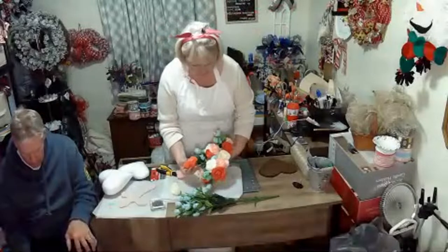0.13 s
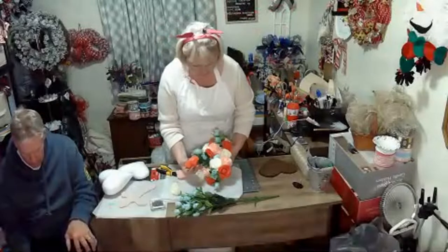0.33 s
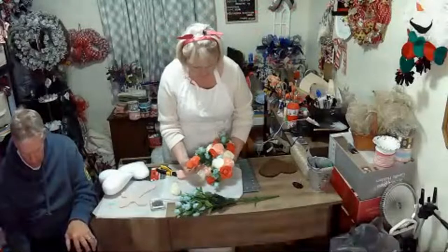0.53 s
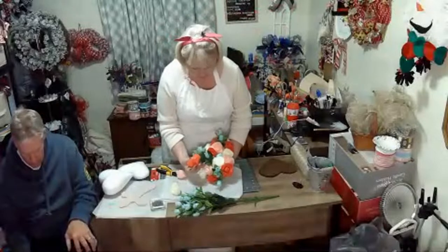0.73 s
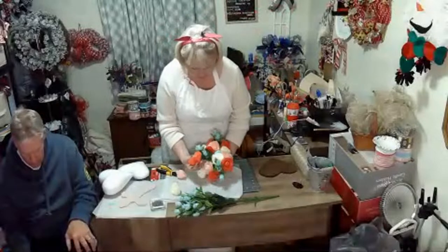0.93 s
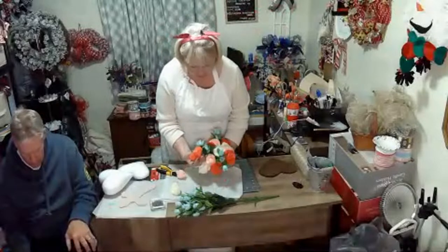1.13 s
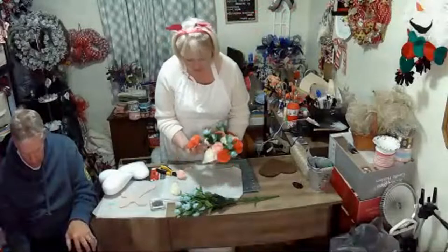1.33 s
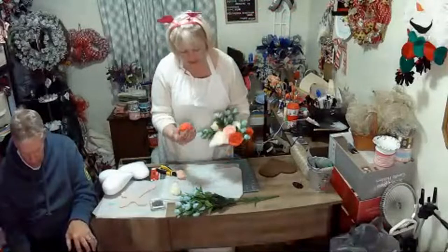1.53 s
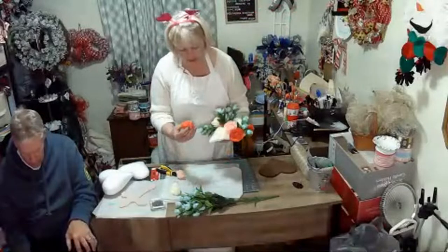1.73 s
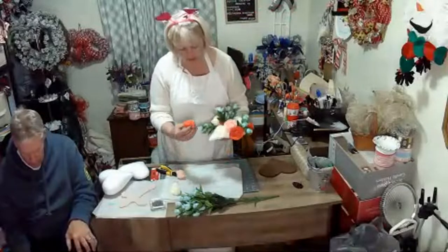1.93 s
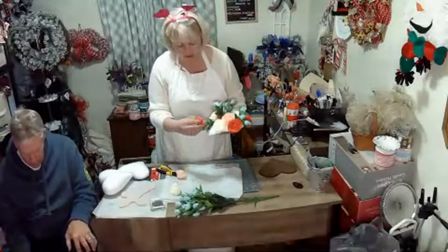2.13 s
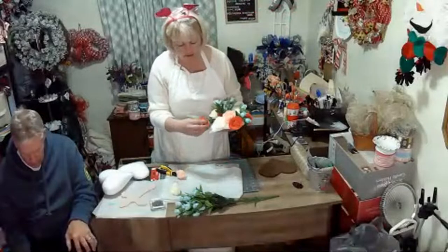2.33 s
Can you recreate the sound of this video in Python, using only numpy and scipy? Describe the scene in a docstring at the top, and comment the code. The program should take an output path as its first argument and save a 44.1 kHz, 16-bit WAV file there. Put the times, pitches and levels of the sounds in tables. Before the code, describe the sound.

Artificial foam flowers crunch and rustle as hands squeeze and turn them at a craft table

```python
"""At a craft table in a small cluttered room, hands press and turn a bunch of foam roses on wire stems.
Squeezed blooms crunch as grainy noise with brief notes; petals and leaves rub as finer grains; bumps
ring the table top as unsteady decaying sines. A far, boxy microphone colours blooms, petals and leaves
with fixed resonances. A diffuse tail follows, over a steady noise of faint low room hum and hiss."""
import sys
import numpy as np
from scipy import signal
from scipy.fft import rfft, irfft, next_fast_len
from scipy.io import wavfile
from scipy.ndimage import uniform_filter1d

SR = 44100
rng = np.random.default_rng(int(sys.argv[2]) if len(sys.argv) > 2 else 0)


def wrap_up_sound(samples):
    """Save the sound to the file named by the first command line argument, as 16-bit audio."""
    columns = np.atleast_2d(samples).T
    # keep every value between -1 and 1, then stretch to whole-number steps
    tamed = np.clip(columns, -1, 1)
    steps = np.round(tamed * 32767).astype(np.int16)
    wavfile.write(sys.argv[1], SR, steps)


def undo_db(level):
    """Turn decibels back into plain size, where 20 dB means ten times bigger."""
    steps = np.asarray(level, float) / 20
    return 10 ** steps


N = 105046  # samples

# All levels in the tables are relative: filters, layer gains and the mix gain follow.
# Squeeze of the blooms, in two stages: bunch pressed and turned, then one bloom drawn out.
# Columns: time_s, level_db, upper_db (upper crunch over level_db)
SQUEEZE_STAGES = [
    [(0.0, -57, 11), (0.028, -54.5, 5), (0.062, -59, 10), (0.08, -70, 3), (0.11, -69, -5),
     (0.122, -48, -29), (0.142, -44.5, -4), (0.172, -46.5, -9.5), (0.188, -51.5, -3.5), (0.256, -41, -7.5),
     (0.396, -44.5, -7.5), (0.416, -34, -6.5), (0.452, -36, 2.5), (0.482, -41.5, -9), (0.51, -33.5, -6),
     (0.572, -50.5, 3.5), (0.618, -36.5, -6), (0.7, -43.5, -1), (0.772, -52.5, -9), (0.798, -39, -3),
     (0.818, -52, -9), (0.85, -52.5, 11.5), (0.872, -48.5, -0.5), (0.934, -54, 3.5), (0.974, -54, -10),
     (1.026, -53, -1.5), (1.17, -48.5, -7.5)],
    [(1.18, -52, -2), (1.232, -48.5, -5), (1.296, -54, -21), (1.322, -75, 9), (1.352, -60, -2),
     (1.382, -71, -18), (1.456, -63.5, -1), (1.48, -72, 0), (1.506, -52, -3.5), (1.57, -53, -1),
     (1.682, -52.5, -6.5), (1.704, -57, -14), (1.752, -65.5, -10), (1.844, -68, -38), (1.882, -92, 3),
     (1.948, -81, 6), (1.956, -69, -18), (1.98, -68, -9.5), (1.996, -64, -28), (2.026, -65, -6.5),
     (2.062, -68.5, -11), (2.1, -63, -23), (2.148, -92.5, -4), (2.24, -98, 4), (2.25, -70.5, -25.5)],
]
# Brief notes within the crunching, loud and faint, where a bloom's cup swells.
# Columns: peak_s, level_db, pitch_hz, length_s (from the peak to 46 dB below it)
CUP_NOTES = [(0.293, -53, 650, 0.01), (0.328, -34.5, 699, 0.0097), (0.347, -33, 695, 0.0072),
             (0.38, -38.5, 640, 0.018), (0.419, -27.5, 650, 0.029), (0.447, -22.5, 640, 0.019),
             (0.468, -38, 757, 0.0098), (0.51, -28, 676.3, 0.017), (0.63, -37, 640, 0.061),
             (0.803, -31.5, 653.7, 0.011), (0.842, -36, 640, 0.017), (1.015, -37.5, 648, 0.006),
             (1.576, -40.5, 574, 0.0062), (1.837, -56, 616, 0.021), (2.018, -57.5, 594, 0.018)]
# Rubbing petals, in three stages: bunch pressed, bunch turned, one bloom drawn out.
# Columns: time_s, level_db, then over it fizz_db, lower_db (lower rub), scratch_db
RUB_STAGES = [
    [(0.0, -41, -21, -10, -21), (0.016, -50, -23, -13, -10), (0.026, -45, -15.5, -9.5, -17),
     (0.09, -57.5, -15, -9, -19), (0.132, -46.5, -7, 1, -9), (0.138, -47.5, -7, -1, -8),
     (0.18, -51, -10, -4, -10), (0.284, -44, -11, -2, -12), (0.328, -52.5, -4.5, -0.5, -6.5),
     (0.454, -38, -14, -4, -14), (0.48, -43, -14.5, -2, -18), (0.534, -42, -4, -3.5, -9),
     (0.598, -47.5, -21, -1.5, -14.5), (0.612, -41.5, -18, -14, -9), (0.646, -44, -11.5, 2.5, -11),
     (0.772, -48.5, -10.5, -12, -14), (0.784, -67, -9, 10, -8), (0.8, -39.5, -19, -18.5, -14),
     (0.83, -57, -5, 4, -26), (0.842, -47, -15, -14.5, -10), (0.88, -45.5, -15, -9, -18)],
    [(0.89, -49.5, -9, -15, -8), (0.918, -41.5, -7.5, -7.5, -11.5), (0.936, -48, 0, -8.5, -10),
     (0.97, -47.5, -9, -9, -11), (1.0, -44.5, -12.5, -9, -17), (1.012, -44.5, -6.5, -7.5, -12),
     (1.03, -45, -8.5, -5, -8), (1.068, -42, -6.5, -7, -11), (1.088, -43, -4.5, -7, -8),
     (1.106, -41.5, -3.5, -7.5, -12), (1.14, -43, -9, 0, -13), (1.16, -48.5, -10, -18, -17),
     (1.194, -55, -7, 6.5, -13), (1.224, -53.5, -10.5, -2.5, -11), (1.256, -63, -8, 3, -27),
     (1.286, -51.5, -20, -1, -35), (1.302, -61.5, -12, -7, -21), (1.352, -55, -15.5, -14, -32),
     (1.408, -62.5, -2.5, -3.5, -12), (1.444, -55, -3, -7.5, -13), (1.47, -59, -16, -11, -26)],
    [(1.48, -66, -11, -22, -21), (1.49, -54.5, -1.5, -11.5, -14), (1.532, -52, -4, -2.5, -15.5),
     (1.584, -51.5, -20.5, -15, -16), (1.6, -66, -9, -4, -25), (1.625, -56, -8, -6, -17),
     (1.67, -49, -4, -11, -12.5), (1.7, -56.5, -1.5, -2, -8), (1.74, -66.5, -8, -16, -27),
     (1.77, -61, -13, -16, -23), (1.8, -77, -4, -13, -18), (1.814, -72, -13, -25, -23),
     (1.834, -76.5, -5, -3.5, -14), (1.902, -74, -14, -25, -27), (1.926, -84, -13, -2, -16),
     (1.996, -77.5, -7, -6, -16), (2.076, -69.5, -17, -14, -11), (2.104, -75.5, -13.5, -10, -16),
     (2.144, -87.5, 4, -18, -2.5), (2.25, -89, -2, 0, -3.5), (2.3, -81.5, -12, -6, -9),
     (2.38, -85, -8, 1, -11)],
]
# Snaps of a petal. Columns: mark_s (one rise time after the onset), level_db
PETAL_SNAPS = [(0.0178, -44), (0.1326, -32), (0.498, -33.5), (0.608, -30.5), (0.637, -29.5), (0.704, -37.5),
               (0.793, -41.5)]
# Brief squeaks of petal edges. Columns: peak_s, level_db, pitch_hz, length_s (to 46 dB down)
EDGE_SQUEAKS = [(0.028, -36, 3540, 0.013), (0.039, -35.5, 3520, .01), (0.14, -31, 3450, 0.0053),
                (1.135, -41.5, 2220, 0.033), (1.66, -50, 3600, 0.022), (1.685, -45, 3620, 0.017),
                (2.05, -64.5, 3650, 0.063), (2.35, -74, 3620, 0.025)]
# Brushing leaves. Columns: time_s, level_db
LEAF_BRUSH = [(0.84, -64), (0.868, -54), (0.93, -64), (0.975, -76), (1.015, -56), (1.05, -54),
              (1.14, -51.5), (1.165, -62.5), (1.3, -70)]
# Rustle shaken loose by the last bumps. Columns: mark_s (one rise time after the onset), level_db
LEAF_SHAKES = [(2.262, -69.5), (2.305, -71), (2.345, -71)]
# Bumps on the table. Columns: start_s, level_db, pitch_hz (mean), t60_s
TABLE_BUMPS = [(.326, -44, 105.8, 0.098), (0.329, -43.5, 160, 0.12), (0.255, -57.5, 200, .2),
               (0.305, -50, 295, 0.2), (0.435, -39, 304.2, 0.26), (.436, -25, 410, 0.087),
               (0.439, -45, 189.8, 0.19), (.505, -44, 303, 0.4), (0.506, -46.5, 395.5, 0.78),
               (0.52, -44, 173, 0.125), (2.072, -58, 119.4, 0.11), (2.256, -48.5, 309.2, 0.2),
               (2.257, -52.5, 240, 0.34), (2.257, -55.5, 720, 0.18), (2.302, -48.5, 730, 0.11),
               (2.31, -64, 1098, 0.27), (2.344, -52, 761, 0.12), (2.343, -59.5, 295.4, 0.11)]

# Resonances of the microphone's housing, before SKIRT steepens them.
# Columns of all five: centre_hz, width_hz, level_db
BLOOM_LOW_MODES = [(404, 206, -18.5), (551, 93, -6), (640, 63, 2), (707, 64.4, -0.5)]
BLOOM_UPPER_MODES = [(783, 86, 2), (1024, 77, -2), (1159, 72, -8), (1670, 640, -17), (1800, 320, -17.5)]
PETAL_MODES = [(3395, 246, 6.5), (3752, 290, 6.5), (4065, 200, 0.5), (4280, 350, -10)]
PETAL_LOWER_MODES = [(2208, 193, 9), (2100, 280, -0.5)]
LEAF_MODES = [(1234, 71, 1), (1930, 200, -4.5)]

# Spectral envelopes of the scratch, the fizz, the shaken rustle and the floor noise.
# Columns of all four: frequency_hz, level_db
SCRATCH_COLOUR = [(900, -28), (1300, -7.5), (1800, -7), (2800, 1), (4400, 4.5), (5500, -5.5), (7000, -9),
                  (8000, -20.5), (8600, -38.5)]
FIZZ_COLOUR = [(7600, -28), (8200, -11), (9400, -6.5), (9900, 0.5), (11900, 0.5), (12300, -14),
               (15500, -11)]
SHAKE_COLOUR = [(500, -30), (900, -3.5), (1300, -2), (1700, 1.5), (2200, -10.5), (3000, -13.5)]
FLOOR_COLOUR = [(26, -41.5), (45, -4.5), (130, -1), (240, -4.5), (330, -9), (500, -10), (700, -11.5),
                (1050, -16), (1500, -20.5), (2250, -22), (2700, -24.5), (3450, -25.5), (4700, -26.5),
                (7900, -28), (8100, -25.5), (9900, -21), (11800, -24.5), (12200, -22.5), (15760, -22)]

SKIRT = 1.08  # exponent on the resonances; above 1, their flanks fall faster


def blooms():
    """Compression of a cellular solid: foam yields in dull grains, and at times a cup sounds a note."""
    level_db, upper_db = curves(np.vstack(SQUEEZE_STAGES))
    low_grains = grains(rate_hz=73, life_s=0.012, spread_db=0.0, bed=4.2)
    upper_grains = grains(rate_hz=140, life_s=0.011, spread_db=5.5, bed=0.86)
    low = undo_db(level_db - 0.5) * low_grains
    upper = undo_db(level_db + upper_db) * patchy(upper_grains, depth_db=1.0)
    crunch = filtered(low, resonances(BLOOM_LOW_MODES)) + filtered(upper, resonances(BLOOM_UPPER_MODES))
    return crunch + notes(CUP_NOTES, waver_hz=7.64)


def petals():
    """Sliding friction: petals rub, scratch and fizz in grains, with snaps and squeaks of their edges."""
    level_db, fizz_db, lower_db, scratch_db = curves(np.vstack(RUB_STAGES))
    crackle = grains(rate_hz=500, life_s=0.002, spread_db=1.4, bed=1.6)
    coarse = patchy(crackle, depth_db=1.5)
    fine = unit(0.43 * crackle + grains(rate_hz=120, life_s=0.007, spread_db=4.5, bed=0.8))
    snaps = undo_db(-4.5) * bursts(PETAL_SNAPS, rise_s=0.0028, t60_s=0.041)

    # the same snaps enter the rub, the scratch and the fizz
    rub = undo_db(level_db) * coarse + 1.13 * snaps
    lower_rub = undo_db(level_db + lower_db) * coarse
    scratch = undo_db(level_db + scratch_db + 5.5) * patchy(fine, depth_db=2.0) + 0.805 * snaps
    fizz = undo_db(level_db + fizz_db) * fine + snaps
    return (filtered(rub, resonances(PETAL_MODES))
            + filtered(lower_rub, resonances(PETAL_LOWER_MODES))
            + filtered(scratch, colour(SCRATCH_COLOUR))
            + filtered(fizz, colour(FIZZ_COLOUR))
            + notes(EDGE_SQUEAKS, waver_hz=39.2))


def leaves():
    """Light friction: leaves brush as the bunch turns, and rustle in noise bursts at the last bumps."""
    time_s, level_db = np.transpose(LEAF_BRUSH)
    level = undo_db(np.interp(np.arange(N) / SR, time_s, level_db, -120, -120))
    brush = level * grains(rate_hz=300, life_s=0.004, spread_db=1, bed=1.2)
    rustle = bursts(LEAF_SHAKES, rise_s=0.011, t60_s=0.16)
    return filtered(brush, resonances(LEAF_MODES)) + filtered(rustle, colour(SHAKE_COLOUR))


def table():
    """Damped modal vibration: soft bumps set off short, unsteady rings of the table top."""
    t = np.arange(N) / SR
    rise_s, waver_share = 0.006, 0.1  # waver as an rms share of the pitch
    rings = np.zeros(N)
    for start_s, level_db, pitch_hz, t60_s in TABLE_BUMPS:
        age = np.maximum(t - start_s, 0)
        decay = undo_db(level_db - 60 * age / t60_s)
        rise = 1 - np.exp(-age / rise_s)
        rings += decay * rise * wavering(pitch_hz, waver_share * pitch_hz)
    return rings


def room(x):
    """Diffuse reverberation: convolution with decaying noise that begins after 4 ms."""
    t = np.arange(SR // 3) / SR
    t60_s = 0.14
    tail = rng.standard_normal(len(t)) * undo_db(-60 * t / t60_s) * (t > 0.004)
    return signal.fftconvolve(x, tail / np.linalg.norm(tail))[:N]


def floor_noise():
    """Stationary noise: spectral shaping gives the room's faint low hum and the microphone's hiss."""
    return undo_db(-72) * filtered(rng.standard_normal(N), colour(FLOOR_COLOUR))


def unit(x):
    """Normalisation by power: x scaled to rms 1."""
    return x / np.sqrt(np.mean(np.abs(x) ** 2) + 1e-20)


def curves(rows):
    """Linear interpolation: one value per sample for each column after the time."""
    time_s, *columns = np.transpose(rows)
    return [np.interp(np.arange(N) / SR, time_s, column) for column in columns]


def filtered(x, response):
    """Linear filtering in frequency, scaled to keep the power of white noise."""
    size = next_fast_len(N + SR // 2)
    gain = unit(response(np.fft.rfftfreq(size, 1 / SR)))
    return irfft(rfft(x, size) * gain, size)[:N]


def resonances(modes):
    """Modal superposition: second-order resonances of alternating sign, with steepened flanks."""
    def response(f):
        total = 0
        for k, (centre, width, level_db) in enumerate(modes):
            mode = 1j * f * width / (centre * centre - f * f + 1j * f * width)
            total = total + (-1) ** k * undo_db(level_db) * mode
        return total * np.abs(total) ** (SKIRT - 1)
    return response


def colour(points):
    """Spectral envelope: levels interpolated on a logarithmic frequency axis."""
    hz, db = np.transpose(points)
    return lambda f: undo_db(np.interp(np.log(f + 1), np.log(hz + 1), db, -120, -120))


def grains(rate_hz, life_s, spread_db, bed):
    """Shot noise: random decaying grains of uneven size over a smooth bed modulate noise, rms 1."""
    starts = (rng.random(N) < rate_hz / SR) * undo_db(spread_db * rng.exponential(size=N))
    shape = signal.lfilter([1], [1, -np.exp(-1 / (life_s * SR))], starts)
    return unit((unit(shape) + bed) * rng.standard_normal(N))


def patchy(x, depth_db):
    """Random modulation: smoothed gain patches in time and frequency, result at rms 1."""
    z = signal.stft(x, nperseg=256)[2]
    field = uniform_filter1d(rng.standard_normal(z.shape), size=3, axis=0)
    field = uniform_filter1d(field, size=10, axis=1)
    return unit(signal.istft(z * undo_db(depth_db * unit(field)), nperseg=256)[1][:N])


def bursts(rows, rise_s, t60_s):
    """Transient excitation: noise under an exponential rise and decay for each row."""
    t = np.arange(N) / SR
    shape = np.zeros(N)
    for mark_s, level_db in rows:
        age = np.maximum(t - mark_s + rise_s, 0)
        shape += undo_db(level_db - 60 * age / t60_s) * (1 - np.exp(-age / rise_s))
    return shape * rng.standard_normal(N)


def wavering(hz, waver_hz):
    """Frequency modulation: a sine whose pitch wanders quickly by waver_hz rms."""
    drift = unit(uniform_filter1d(rng.standard_normal(N), size=300))
    return np.sin(2 * np.pi * np.cumsum(hz + waver_hz * drift) / SR)


def notes(rows, waver_hz):
    """Brief tonal resonance: wavering sines that swell and fade under Gaussian envelopes."""
    t = np.arange(N) / SR
    total = np.zeros(N)
    for peak_s, level_db, pitch_hz, length_s in rows:
        swell = np.exp(-(2.3 * (t - peak_s) / length_s) ** 2)
        total += undo_db(level_db) * swell * wavering(pitch_hz, waver_hz)
    return total


def scene():
    """Superposition: the sources with their reverberation, over the steady floor noise."""
    near = blooms() + petals() + leaves() + table()
    in_room = near + undo_db(-7) * room(near)
    return (undo_db(-1.22) * in_room + floor_noise())[None]


def band_limit(x):
    """A steep low-pass at the top of the band."""
    return signal.sosfilt(signal.butter(12, 15770, fs=SR, output="sos"), x)


def record(dry):
    """High-pass response: the microphone loses the bass below 51 Hz."""
    b, a = signal.butter(2, 51, "highpass", fs=SR)
    mix = signal.lfilter(b, a, dry)
    return band_limit(mix)


dry = scene()
out = record(dry)
wrap_up_sound(out)
```